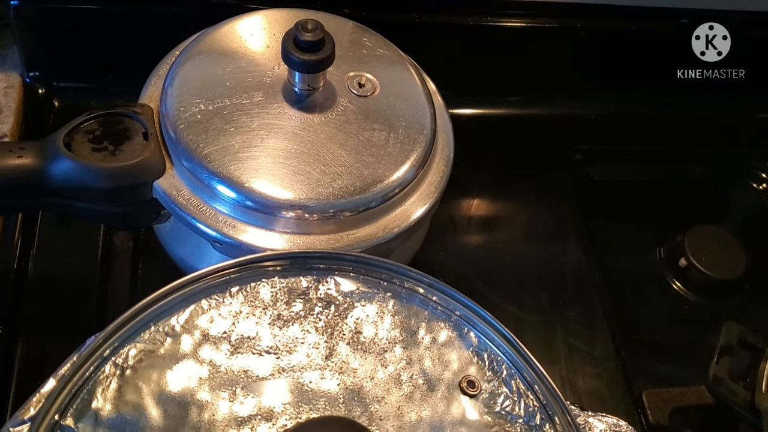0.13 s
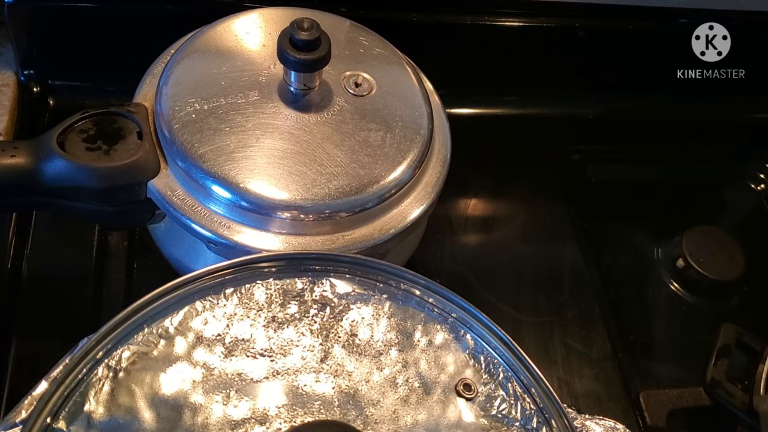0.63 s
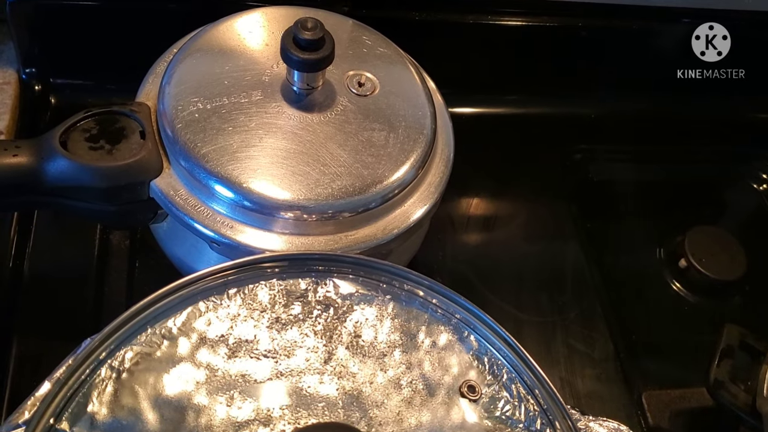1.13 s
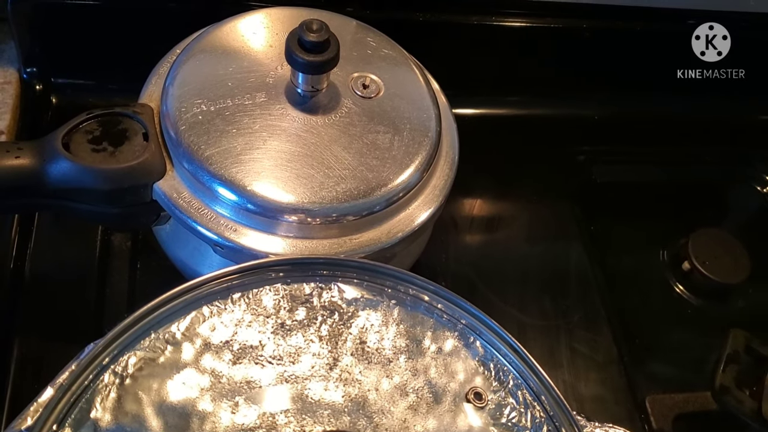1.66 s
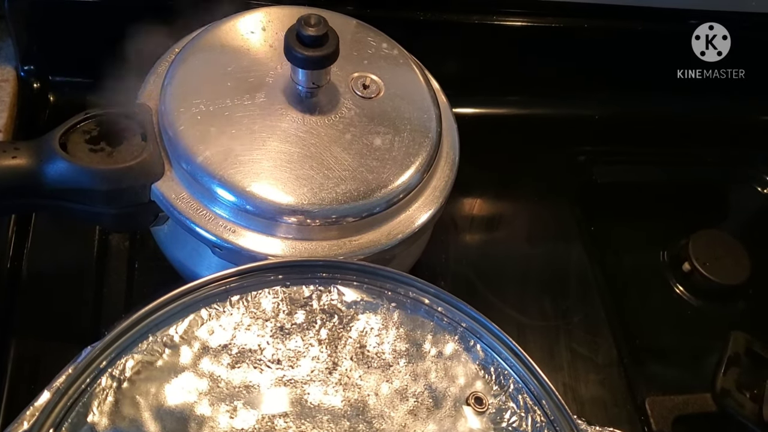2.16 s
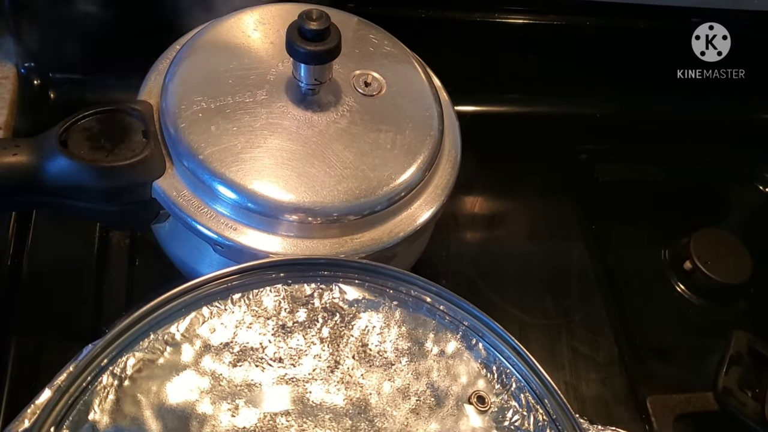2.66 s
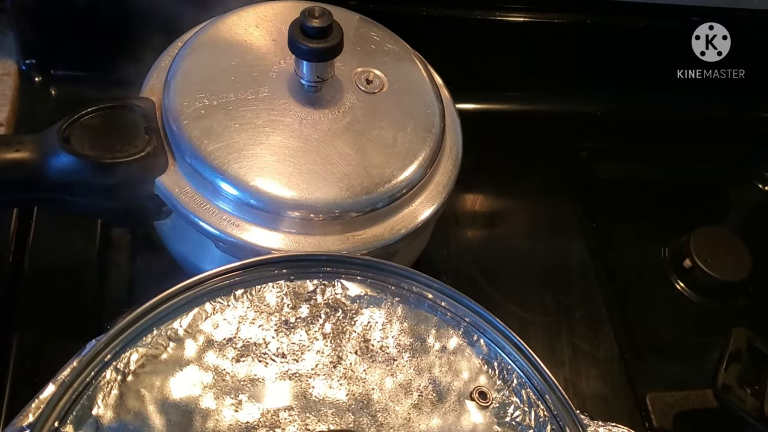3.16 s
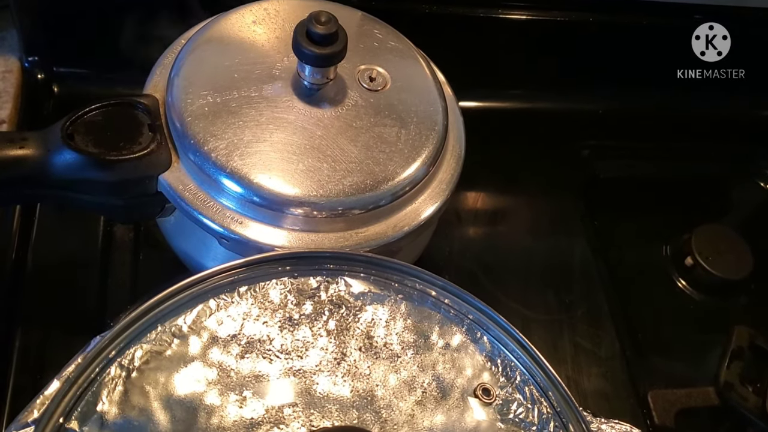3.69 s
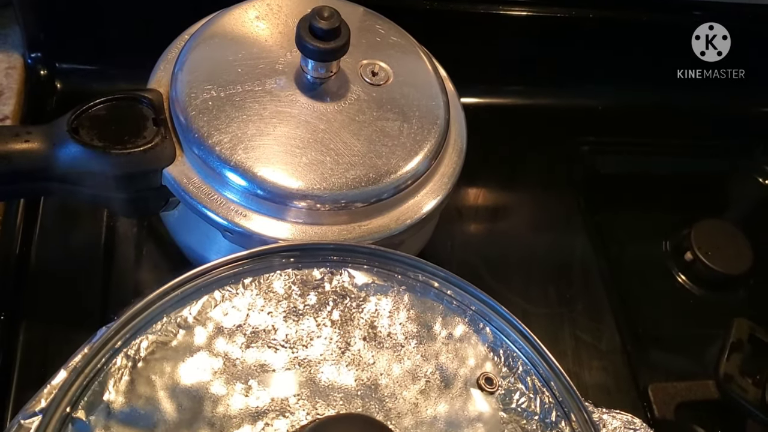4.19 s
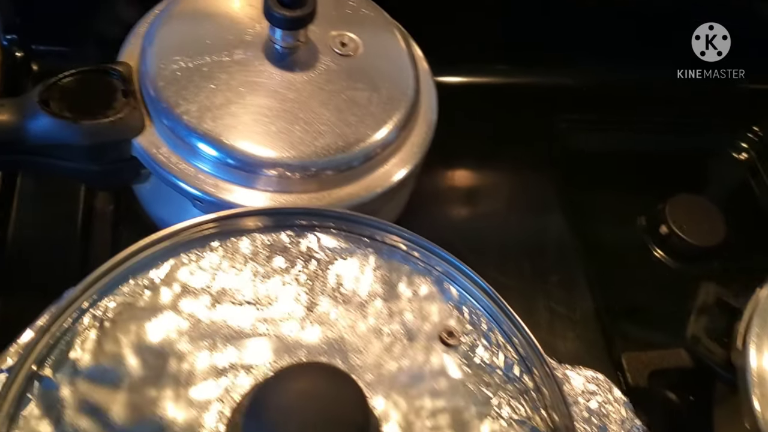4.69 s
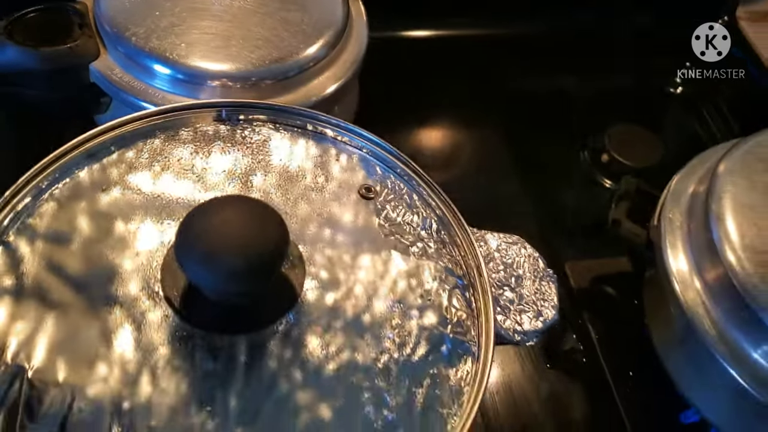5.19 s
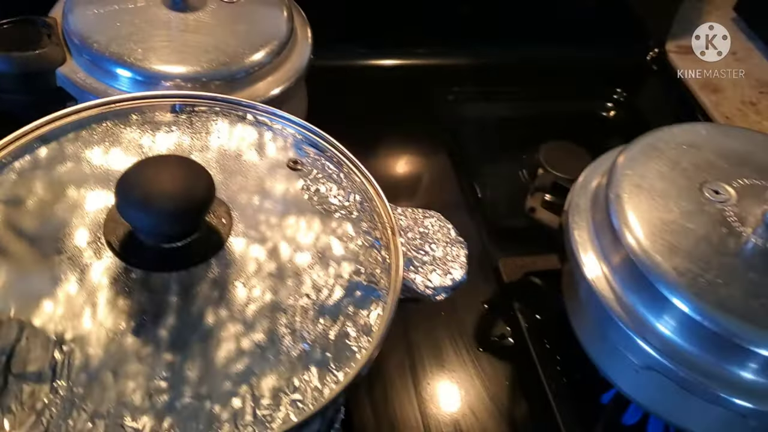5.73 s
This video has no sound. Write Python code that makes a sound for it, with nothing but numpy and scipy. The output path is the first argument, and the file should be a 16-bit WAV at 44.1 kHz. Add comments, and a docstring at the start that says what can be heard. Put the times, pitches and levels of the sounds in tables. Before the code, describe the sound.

Close in a home kitchen, a pressure cooker leaks thin, airy steam over a soft burner rumble. The hiss steps up, pulses quickly, then bursts into a piercing blast that crackles the stereo microphone. After about a second it sputters and stops abruptly. A very faint squeal glides downward in the near quiet, and the hiss and flame roar gradually return.

```python
"""At a stove, by a two-port camera microphone, left port facing the jet, right port shaded: a pressure cooker
leaks steam round its weight (filtered noise) over a gas flame (low noise). The level steps up, the weight
rocks, then lifts in a loud blast that overloads both ports (clicks). It sputters as it drops back; the camera
swings away, the level far down; the last steam squeals faintly (gliding noise bands) and the hiss and
the roar creep back. Now and then the jet spits, and once the metal taps (noise bursts)."""
import sys
import numpy as np
from scipy import signal
from scipy.io import wavfile
from scipy.ndimage import uniform_filter1d

SR = 44100
rng = np.random.default_rng(int(sys.argv[2]) if len(sys.argv) > 2 else 0)


def pcm_store(signal):
    """Save signal as 16-bit PCM."""
    levels = np.round(np.clip(np.atleast_2d(signal), -1, 1) * 32767)
    wavfile.write(sys.argv[1], SR, levels.astype(np.int16).T)


def how_loud(loudness_db):
    """Turn decibels into a plain amplitude multiplier (0 dB gives 1, 20 dB gives 10)."""
    steps = np.asarray(loudness_db, float) / 20
    return 10 ** steps


N = 257530
EDGE_HZ = 15480  # upper limit of the recorded sound


def evened(x):
    """Scaled to rms 1."""
    return x / np.sqrt(np.mean(x ** 2) + 1e-20)


def over_time(rows, t):
    """Each column of a table, joined by straight lines in time."""
    s, *columns = np.transpose(rows)
    return [np.interp(t, s, c) for c in columns]


def over_hz(rows, hz):
    """Each column of a table, joined by straight lines on a log-frequency axis."""
    f, *columns = np.transpose(rows)
    return np.array([np.interp(np.log(hz + 1), np.log(f + 1), c) for c in columns])


def held(t, start, end, rise, fall):
    """Rises from 0 to 1, holds, falls back."""
    return np.clip(np.minimum((t - start) / rise, (end - t) / fall), 0, 1)


def low_passed(x, order, hz):
    """Butterworth low-pass."""
    return signal.lfilter(*signal.butter(order, hz, fs=SR), x)


def port_noise(size, same, lag=0.):
    """Random short-time spectra for two ports that agree by the share same(Hz); right lags by samples."""
    frames, hz = 4 * N // size + 5, np.fft.rfftfreq(size, 1 / SR)
    a, b, c, d = rng.standard_normal((frames, len(hz), 4)).T
    left = a + 1j * b
    alike = np.clip(same(hz), 0, 1)[:, None]
    late = np.exp(-2j * np.pi * hz * lag / SR)[:, None]
    right = alike * left * late + np.sqrt(1 - alike ** 2) * (c + 1j * d)
    return np.array([left, right]), hz, np.arange(frames) * size / 4 / SR


def sound_of(z, size):
    """Short-time spectra back to sound."""
    return signal.istft(z, nperseg=size, noverlap=3 * size // 4)[1][:, :N]


def patches(shape, tall, long):
    """A smooth random field over frequency and time, spread 1."""
    field = rng.standard_normal(shape[::-1]).T
    return evened(uniform_filter1d(uniform_filter1d(field, tall, 0), long, 1))


# The weight lifts and drops back: [t/s, share of the blast colour 0-1]
WEIGHT_OPENS = [(2.05, 0.67), (2.19, 0.48), (2.215, 0.65), (2.3, 0.87), (3.19, 0.99), (3.23, 0.55)]
# The camera swings away: [t/s, share of the turned-away colour 0-1]
CAMERA_TURNS = [(3.7, 0.44), (4.0, 1), (5.1, .95)]
# Relative colour of the steam at the ports while leaking: [f/Hz, left level/dB, right level/dB]
LEAK_COLOUR = [(426, -16, -17), (890, -18, -19.5), (1570, -13, -20), (2230, -8, -12.5), (4100, -9.5, -17.5),
               (5700, -9.0, -24.5), (7000, -4, -35), (7660, -8.5, -23.5), (8700, -7.5, -10.5),
               (9150, 0.4, -9.1), (11450, -0.5, -14.5), (14100, -6.5, -19.5), (16000, -1, -28)]
# The same in the blast: [f/Hz, left level/dB, right level/dB]
BLAST_COLOUR = [(393, -25, -33), (900.0, -34, -43), (1520, -28.5, -40.5), (2420, -18.5, -30.5),
                (3970, -17, -32.5), (5600, -17, -29), (6960, -8.5, -19), (7660, -13, -16), (8270, -9, -9.5),
                (9600, -5.5, -8.5), (11250, -7, -13), (14360, -2, -21), (15130, 1.5, -18)]
# The same with the camera turned away: [f/Hz, left level/dB, right level/dB]
AWAY_COLOUR = [(403, -17.5, -24), (880, -18, -17.5), (1550, -11.5, -22.5), (2540, -12, -17),
               (3900, -9.5, -16.5), (5100, -8.5, -24), (6900, -6.5, -37), (7600, -15, -28),
               (8900, -13.5, -14.5), (9700.0, -7, -18), (11500.0, -8, -17.5), (14000, -9.5, -27),
               (16000, -5.5, -25)]
# Bands that the pots and the stove corner raise or hollow out of the hiss:
# [f/Hz, width/Hz, level leaking/dB, level in the blast/dB, level turned away/dB]
STOVE_BANDS = [(740, 100, 6.5, 4.5, 1.5), (810, 190, 1.5, 1, 5), (940, 100, 6, 7, 1),
               (1416, 137, 6.5, 1.5, 11.5), (1793, 380, 5.5, 0, 6), (2990, 160, -2, 3, -1),
               (3700, 470, -3, 0.5, 4.5), (4790, 390, 5.5, 4.5, 1), (6180, 510, 4.5, 2.5, 3.5),
               (6880, 84, -1, 1.5, -3.5), (8700, 220, -4, 2.5, -1.5), (9690, 240, 0, 7, -3),
               (10600, 570, 6, 1.5, 2.5), (14700, 590, -3, 4.5, 0.5)]


def steam_colour_db(hz, t, fall_db=46.0, fall_hz=573.0):
    """Spectrum of the turbulent steam at each port as the weight lifts and the camera turns."""
    opened, turned = over_time(WEIGHT_OPENS, t)[0], over_time(CAMERA_TURNS, t)[0]
    tables = LEAK_COLOUR, BLAST_COLOUR, AWAY_COLOUR
    leak, blast, away = (over_hz(table, hz)[:, :, None] for table in tables)
    colour_db = leak + opened * (blast - leak) + turned * (away - leak)
    # a small jet makes no bass: fall_db per octave below fall_hz
    colour_db -= fall_db * np.log2(np.clip(fall_hz / (hz + 1), 1, None))[:, None]
    for f, width, leak_db, blast_db, away_db in STOVE_BANDS:
        band_db = leak_db + opened * (blast_db - leak_db) + turned * (away_db - leak_db)
        colour_db += band_db / (1 + (2 * (hz - f) / width) ** 2)[:, None]
    return colour_db


# Bounces off the lid and the stove top, left port then right: [delay/ms, gain]
LID_BOUNCES = [
    [(.72, 0.094), (1.55, 0.06), (2.4, 0.072), (3.1, 0.015)],
    [(.68, 0.18), (1.4, 0.11), (2.2, 0.084), (3.4, 0.086)],
]


def bounce_ripple(hz):
    """Delayed bounces add to the direct sound and ripple the spectrum at each port."""
    ripple = []
    for bounces in LID_BOUNCES:
        reflected = sum(gain * np.exp(-2j * np.pi * hz * ms / 1000) for ms, gain in bounces)
        ripple.append(1 + reflected)
    return np.array(ripple)[:, :, None]


# Likeness of the hiss at the two ports: [f/Hz, share 0-1]
PORT_LIKENESS = [(100, 0.44), (700, 0.69), (1500, 0.32), (2500, 0.55), (6000, 0.14), (9000, 0.46),
                 (11000, 0.29), (15000, 0.6)]
# Slow course of the jet before the weight's movement and the level steps:
# [t/s, relative level/dB, body under 1300 Hz/dB, tilt/dB per octave, extra shading of the right port/dB]
JET_COURSE = [(0.0, -41.5, 1, -1.5, 2), (.58, -40.5, 2.5, -1.24, -.8), (.76, -44, -.5, -2.3, -1),
              (.9, -40.5, 3, -1.5, 1.2), (1.24, -41.5, 1.5, -1.95, 0), (1.42, -40.5, 2, -2.24, .8),
              (1.85, -35.5, 3, -1, .5), (2.05, -38.5, 1.5, -2.5, 0.5), (2.16, -24, 1, 0.55, .8),
              (2.2, -24.5, 6, 1.5, 0), (2.26, -23, -5, 2.1, 1), (2.33, -23, -2, 0, 2),
              (3.19, -24, -4.5, -0.17, 1), (3.26, -36, -0.5, -1.04, -.8), (3.39, -31, 8.5, 1, .3),
              (3.47, -32.5, 8, 2, 1.5), (3.51, -32, -3, 2.5, -2), (3.57, -30, 1, 2, -0.5),
              (3.68, -34.5, -2, 4, 5), (3.71, -50.5, -5, -2, 1.1), (3.77, -58, -1.5, -2, 0),
              (3.97, -58.5, 3, 1.6, 2), (4.4, -57.5, 1, 0.1, 3), (4.7, -55.5, 1, -.5, 0.5),
              (5.2, -44.5, 1, -0.75, 0), (5.84, -42.5, 4, -0.5, 1)]
LAG_SAMPLES = 3.28  # the jet reaches the left port first
# each dB of the weight's movement tilts the hiss up (dB per octave) and thins its body (dB)
BRIGHTER, HOLLOWER = 0.29, -0.046


def jet(patchy_db=1.21, flutter_db=0.33, ripple_db=2.03):
    """Turbulent hiss of the escaping steam, shaped by the weight, the bounces and random wandering."""
    z, hz, t = port_noise(size=1024, same=lambda f: over_hz(PORT_LIKENESS, f)[0], lag=LAG_SAMPLES)
    body_db, tilt_db, shade_db = over_time(JET_COURSE, t)[1:]
    body_db = body_db + HOLLOWER * weight_db(t)
    tilt_db = tilt_db + BRIGHTER * weight_db(t)
    colour_db = steam_colour_db(hz, t)
    colour_db += tilt_db * np.log2(np.clip(hz, 300, None) / 9000)[:, None]
    colour_db += body_db / (1 + (hz / 1300) ** 4)[:, None]
    colour_db[1] -= shade_db
    shape = how_loud(colour_db) * bounce_ripple(hz) * (hz < EDGE_HZ)[:, None]
    shape /= np.sqrt((abs(shape) ** 2).sum((0, 1)))  # equal power in every frame
    wander_db = patchy_db * patches(z.shape[1:], 14, 10)
    wander_db = wander_db + flutter_db * patches(z.shape[1:], 180, 2)
    # a fine random ripple over frequency, slowly drifting, separate at each port
    wander_db = wander_db + ripple_db * np.array([patches(z.shape[1:], 3, 90) for port in z])
    hiss = evened(sound_of(z * shape * how_loud(wander_db), size=1024))
    t = np.arange(N) / SR
    return np.sqrt(2) * hiss * how_loud(over_time(JET_COURSE, t)[0] + weight_db(t))


# Loudness of the burner roar as recorded, before the level steps: falls from 2.13 s, lowest near 4 s,
# then returns: [t/s, relative level/dB, rumble under 80 Hz/dB]
FLAME_COURSE = [(0.0, -52.5, 1), (1.42, -53.5, 5), (1.86, -51.5, 0), (2.13, -53, 1), (2.25, -61.5, -5),
                (3.25, -65, -6), (3.31, -62, -10), (3.64, -65, -13), (3.71, -76, -14), (3.92, -78, -7),
                (3.99, -80, -3), (4.31, -79, 4), (4.6, -73.5, 1), (4.85, -67.5, 1), (5.08, -60.5, 10),
                (5.3, -55.5, 3), (5.84, -54, 1)]
# Relative spectrum of the roar: [f/Hz, level/dB per Hz]
ROAR_COLOUR = [(12, -53), (20, -23), (38, -16), (59, 1.5), (76, 0.5), (225, -8.5), (265, -14.5),
               (306, -9.5), (489, -16), (690, -14), (1010, -19), (1370, -17), (1500, -33.5), (1950, -43),
               (3300, -120)]


def flame(lumpy_db=1.5, right_db=-2.0):
    """Low roar of the burners: coloured noise, nearly the same at both ports."""
    z, hz, t = port_noise(size=2048, same=lambda f: 0.94 + 0 * f)
    # the roar is slightly fuller near 340 Hz with the camera turned away
    fuller_db = 1.6 * over_time(CAMERA_TURNS, t)[0] * np.exp(-((hz[:, None] - 340) / 120) ** 2)
    deep_db = over_time(FLAME_COURSE, t)[1] / (1 + (hz[:, None] / 80) ** 4)
    lumps_db = lumpy_db * patches(z.shape[1:], 6, 6)
    z *= how_loud(over_hz(ROAR_COLOUR, hz)[0][:, None] + fuller_db + deep_db + lumps_db)
    roar = evened(sound_of(z, size=2048)) * how_loud(np.array([[0], [right_db]]))
    return roar * how_loud(over_time(FLAME_COURSE, np.arange(N) / SR)[0])


# The jet spits, and once the metal taps, before the port gains:
# [t/s, level/dB, f/Hz, half width/Hz, decay time constant/ms]
SPITS_AND_TAP = [(0.7402, -34, 13100, 3500, 4.), (3.8034, -51.5, 1150, 400, 2.5),
                 (5.0592, -43, 12500, 3500, 7.), (5.0596, -44, 4460, 2200, 2.5)]


def ticks(left_db=3, right_db=-8.0):
    """Short bursts of noise in a band, dying exponentially."""
    out, t = np.zeros(N), np.arange(800) / SR
    bursts = rng.standard_normal((len(SPITS_AND_TAP), 800))
    for (s, db, hz, half_width_hz, ms), burst in zip(SPITS_AND_TAP, bursts):
        low_hz, high_hz = max(hz - half_width_hz, 100), min(hz + half_width_hz, 20000)
        band = signal.butter(2, [low_hz, high_hz], "band", fs=SR)
        grain = evened(signal.lfilter(*band, burst))
        out[round(s * SR):][:800] += how_loud(db) * grain * np.exp(-1000 * t / ms)
    return out * how_loud(np.array([[left_db], [right_db]]))


# Jet, flame and squeal step up or down together, each step lasting: [t/s, change of level/dB]
LEVEL_STEPS = [(1.413, 5), (3.971, -7.5), (4.058, -1.5)]


def level_steps(t):
    """Gain that jumps at each step and stays there."""
    return how_loud(sum(db * (t > s) for s, db in LEVEL_STEPS))


# The weight kicks up and lets out a puff: [peak t/s, half length/s, level over the hiss/dB]
WEIGHT_PUFFS = [(3.172, .03, 1.5), (3.375, 0.018, 6), (3.473, .022, 8.5), (3.63, 0.032, 5),
                (4.578, 0.1, 4.5)]
# The weight drops shut for a moment: [start t/s, end t/s, change of level/dB]
WEIGHT_SHUTS = [(3.484, 3.525, -14), (3.585, 3.643, -14.5)]
# before the blast the weight rocks on its seat, every second crest weaker
ROCK_FIRST_S, ROCK_LAST_S, ROCK_CRESTS = 1.462, 1.828, 5
ROCK_DB, ROCK_UNEVEN_DB = 2.2, 0.5
SHUT_FALL_S, SHUT_RISE_S = 0.017, 0.021


def weight_db(t):
    """How far the moving weight lifts or lowers the hiss, in dB: rocking, puffs and shuts."""
    period = (ROCK_LAST_S - ROCK_FIRST_S) / (ROCK_CRESTS - 1)
    rocking = (t > ROCK_FIRST_S - period / 4) * (t < ROCK_LAST_S + period / 4)
    db = ROCK_DB * rocking * np.cos(2 * np.pi * (t - ROCK_FIRST_S) / period)
    db += ROCK_UNEVEN_DB * rocking * np.cos(np.pi * (t - ROCK_FIRST_S) / period)
    db += sum(d * held(t, s - half, s + half, half, half) for s, half, d in WEIGHT_PUFFS)
    return db + sum(d * held(t, a, b, SHUT_FALL_S, SHUT_RISE_S) for a, b, d in WEIGHT_SHUTS)


# Dense crackle of the left port, a steady run and three surges, before the blunting filter:
# [start t/s, end t/s, rms click level/dB]
LEFT_CRACKLE = [(2.254, 3.225, -27.5), (2.298, 2.57, -27.5), (2.643, 2.86, -21.5), (2.92, 3.203, -23.5)]
# Single overloads of the right port: [t/s, click area/dB, sign]
RIGHT_POPS = [(2.7286, -5, 1), (2.7527, -17, -1), (2.7668, -3, -1), (2.872, -5, -1), (2.956, -6, -1),
              (3.0826, -11, -1), (3.1746, -1, -1)]
CRACKLES_PER_S, CRACKLE_RISE_S, CRACKLE_FALL_S = 900., 0.076, 0.04


def overload(spread_db=2.5, blunt_hz=2800.0, settle_hz=99.0, settle_db=6.0):
    """Overloaded ports: blunt clicks of either sign, on the left each with a slow settling."""
    t, clicks = np.arange(N) / SR, np.zeros((2, N))
    chance, size, sign = rng.random((N, 3)).T
    struck = chance < CRACKLES_PER_S / SR
    height = how_loud(-spread_db * np.log(np.maximum(size, 1 / 100)))  # many small clicks, few tall ones
    train = struck * height * np.sign(sign - .5)
    power = sum((how_loud(db) * held(t, a, b, CRACKLE_RISE_S, CRACKLE_FALL_S)) ** 2 for a, b, db in LEFT_CRACKLE)
    clicks[0] = evened(train) * np.sqrt(power)
    for s, area_db, sign in RIGHT_POPS:
        clicks[1, round(s * SR)] = np.sign(sign) * how_loud(area_db)
    blunt = low_passed(clicks, 1, blunt_hz)
    blunt[0] += how_loud(settle_db) * low_passed(clicks[0], 1, settle_hz)
    return blunt


# The last steam squeals through the seat in overlapping glides, before swell, port gains and level steps:
# [start t/s, end t/s, from f/Hz, to f/Hz, level/dB, octave level/dB]
SQUEAL_GLIDES = [(3.8, 3.975, 7150, 6980, -79, -65), (3.9, 4.08, 6800, 6630, -68, -67),
                 (4.04, 4.19, 6640, 6600, -70, -82), (4.09, 4.36, 6060, 5760, -70.5, -68),
                 (4.29, 4.68, 5530, 4800, -70, -72.5)]
SQUEAL_RISE_S, SQUEAL_FALL_S, SQUEAL_SAG_POWER = .08, .035, 1.5
SQUEAL_FLICKER_DB, SQUEAL_SWELL_DB = 1.5, 4  # random flicker; each glide grows by the swell to its end
THIRD_HZ, THIRD_WIDTH_HZ, THIRD_DB = 15200, 450, 12  # the third partial stands out only near this band


def squeal(half_width_hz=110., left_db=8., right_db=-6.):
    """A breathy whistle: each partial is a narrow band of noise that rides on a sagging pitch."""
    t, out = np.arange(N) / SR, np.zeros(N)
    for start, end, from_hz, to_hz, db, octave_db in SQUEAL_GLIDES:
        along = np.clip((t - start) / (end - start), 0, 1)
        hz = from_hz + (to_hz - from_hz) * along ** SQUEAL_SAG_POWER
        phase = 2 * np.pi * np.cumsum(hz) / SR
        third = how_loud(db + THIRD_DB) / (1 + (2 * (3 * hz - THIRD_HZ) / THIRD_WIDTH_HZ) ** 2)
        flicker = evened(low_passed(rng.standard_normal(N), 2, 20))
        sounding = held(t, start, end, SQUEAL_RISE_S, SQUEAL_FALL_S)
        sounding = sounding * how_loud(SQUEAL_FLICKER_DB * flicker + SQUEAL_SWELL_DB * along)
        for k, gain in enumerate([how_loud(db), how_loud(octave_db), third], 1):
            a, b = low_passed(rng.standard_normal((2, N)), 2, k * half_width_hz)
            breath = evened(a * np.cos(k * phase) + b * np.sin(k * phase))
            out += gain * sounding * breath
    return out * how_loud(np.array([[left_db], [right_db]]))


def scene():
    """Jet, flame and squeal under the common level steps, with the ticks."""
    stepped = (jet() + flame() + squeal()) * level_steps(np.arange(N) / SR)
    return stepped + ticks()


def low_pass(x):
    """Removes everything above the highest recorded frequency."""
    return signal.sosfilt(signal.butter(12, 16830, fs=SR, output="sos"), x)


def record(dry):
    """The two-port microphone: overload clicks, bass cut, steep band limit, clipping at full scale."""
    wet = signal.lfilter(*signal.butter(3, 48, "high", fs=SR), dry + overload())
    edge = signal.firwin(701, EDGE_HZ, window=("kaiser", 9), fs=SR)
    limited = signal.oaconvolve(wet, edge[None], "same")
    finished = np.clip(limited, -1, 1)
    return low_pass(finished)


dry = scene()
out = record(dry)
pcm_store(out)
```